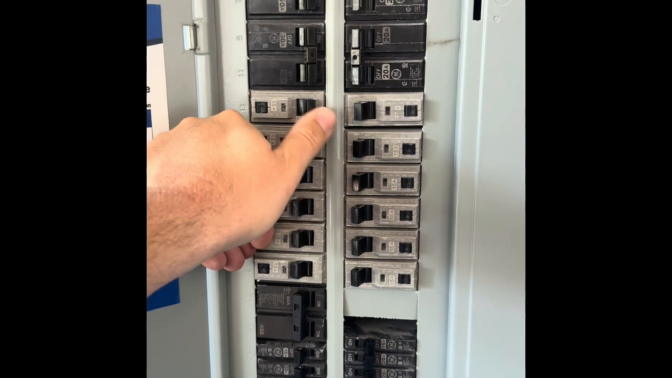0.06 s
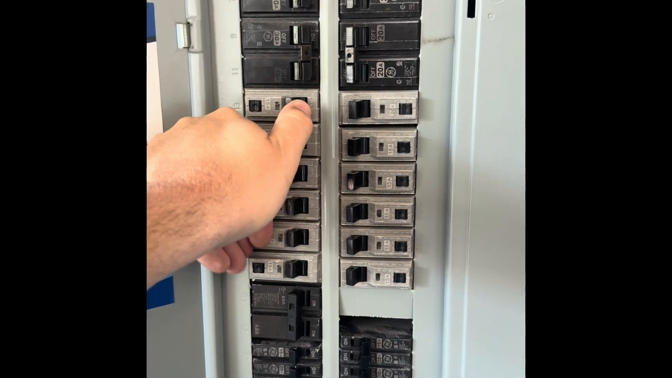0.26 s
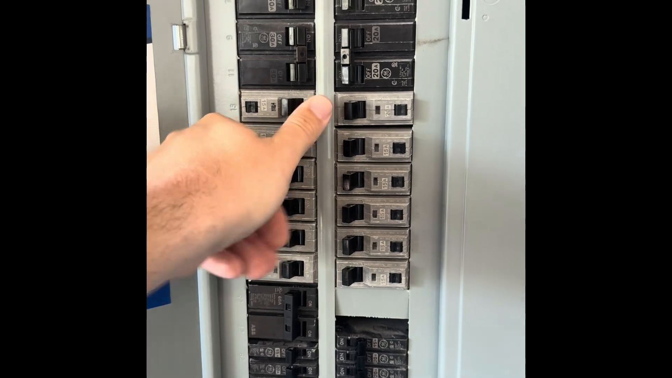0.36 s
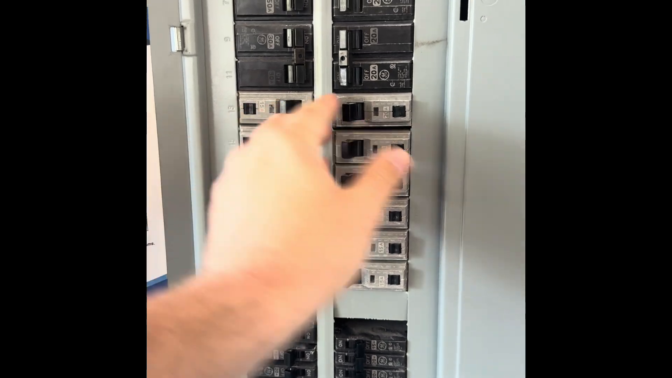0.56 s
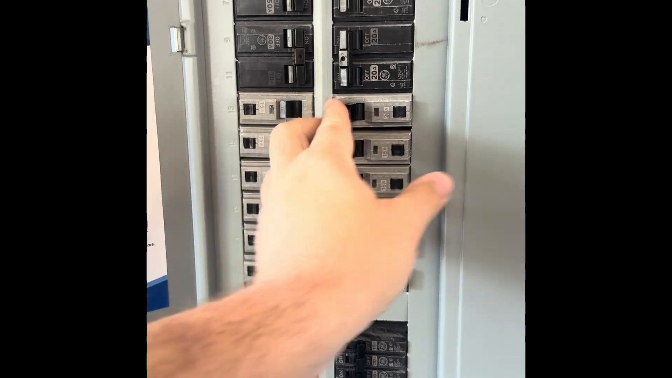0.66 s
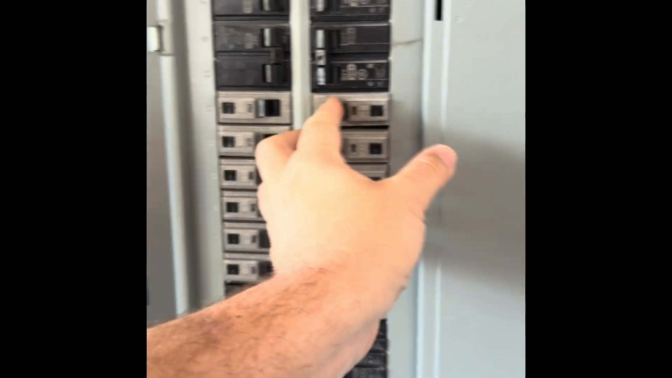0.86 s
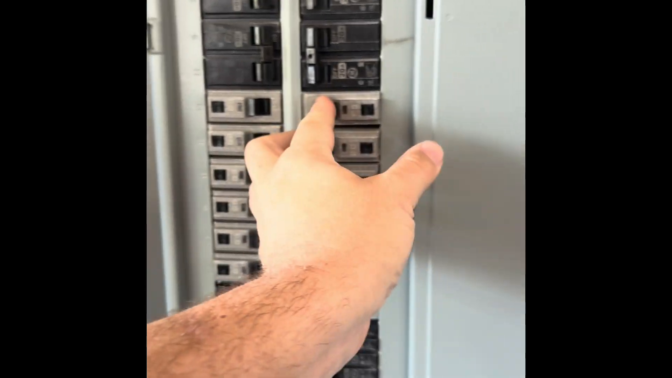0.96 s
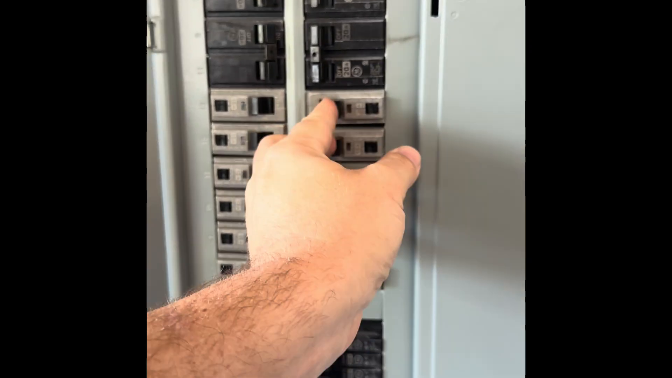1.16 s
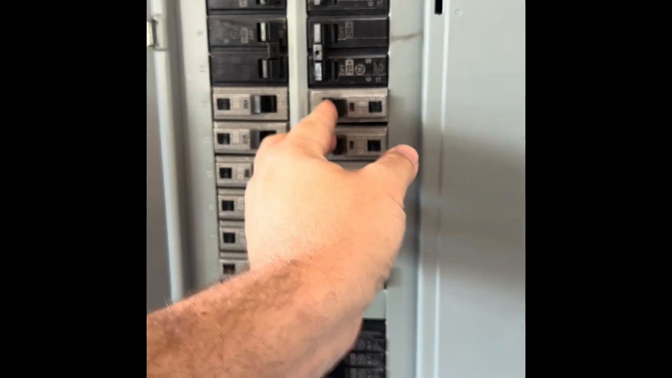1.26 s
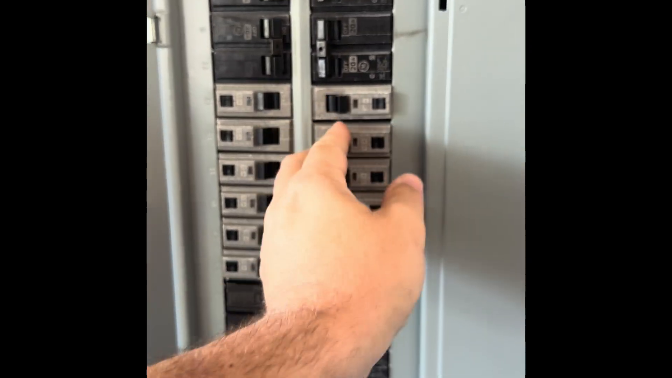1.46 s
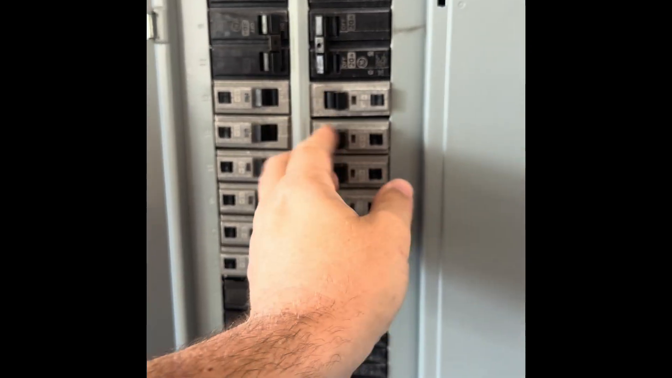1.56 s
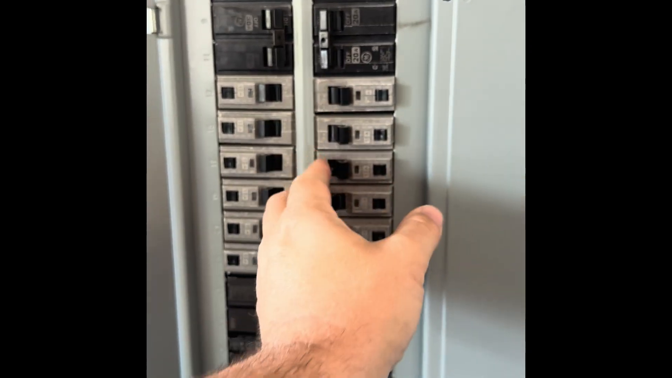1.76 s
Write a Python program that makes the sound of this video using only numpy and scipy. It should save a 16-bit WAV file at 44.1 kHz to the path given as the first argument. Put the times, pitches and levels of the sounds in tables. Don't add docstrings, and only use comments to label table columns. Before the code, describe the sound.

Four hard breaker-switch snaps in a steel panel, each with a short bright room echo.

```python
import sys
import numpy as np
from scipy import signal
from scipy.fft import rfft, irfft
from scipy.io import wavfile
from scipy.ndimage import uniform_filter1d

SR = 44100
rng = np.random.default_rng(int(sys.argv[2]) if len(sys.argv) > 2 else 0)


def master_out(mix):
    frames = np.transpose(np.atleast_2d(mix))
    ceiling = np.clip(frames, -1, 1)
    pcm = np.round(ceiling * 32767).astype(np.int16)
    wavfile.write(sys.argv[1], SR, pcm)


def voltage_ratio(level):
    return 10 ** (np.asarray(level, float) / 20)


N = 79380


def unit(x):
    return x / np.sqrt(np.mean(x ** 2) + 1e-30)


def on_log(hz, table):
    table = np.array(table, float)
    return np.interp(np.log(np.maximum(hz, 1)), np.log(table[:, 0]), table[:, 1])


def ring(x, hz, width):
    r = np.exp(-np.pi * width / SR)
    return signal.lfilter([1 - r, 0, r - 1], [1, -2 * r * np.cos(2 * np.pi * hz / SR), r * r], x)


def coloured(table):
    hz = np.arange(N // 2 + 1) * SR / N
    white = rfft(rng.standard_normal(N))
    noise = unit(irfft(white * voltage_ratio(on_log(hz, table)), N))
    return rfft(noise), hz


def walk(rate):
    k = int(SR / rate)
    steps = np.repeat(rng.standard_normal(N // k + 1), k)
    return unit(uniform_filter1d(steps, k)[:N])


# pitch_hz, level_db (per Hz)
AIR_MID_COLOUR = [(25, -29), (55, -7.5), (87, -6.5), (160, -20), (500, -28), (900, -27.5), (1600, -39),
                  (8500, -54.5), (10000, -90)]
AIR_SIDE_COLOUR = [(180, -21), (300, -12.5), (528, -4.5), (946, -1), (1230, -7), (1460, -12.5), (1900, -20),
                   (2880, -12.5), (15700, -32), (16050, -48)]
AIR_MID_DB, AIR_SIDE_DB = -50, -66


def air():
    mid = voltage_ratio(AIR_MID_DB) * irfft(coloured(AIR_MID_COLOUR)[0], N)
    side = voltage_ratio(AIR_SIDE_DB) * irfft(coloured(AIR_SIDE_COLOUR)[0], N)
    return np.array([mid, side])


# pitch_hz, width_hz, level_db
DRONE_TONES = [(84.3, 4, -2), (60, 5, -8), (105, 12, -17)]
# time_s, level_db
DRONE_LEVEL = [(0, -42), (.19, -44.5), (.3, -41.5), (.55, -42), (.8, -48.5), (.89, -62), (.97, -37),
               (1.06, -47), (1.13, -42.5), (1.22, -54), (1.31, -48), (1.36, -46.5), (1.42, -42),
               (1.47, -47), (1.53, -37.5), (1.62, -41), (1.67, -47), (1.8, -40.5)]
DRONE_LINE_SHARE = .9
DRONE_SLEW_S = .04


def drone(t):
    hum = 0
    for hz, width, db in DRONE_TONES:
        line = np.sin(2 * np.pi * (hz * t + rng.random()))
        noise = unit(ring(ring(rng.standard_normal(N), hz, width), hz, 2 * width))
        hum = hum + voltage_ratio(db) * (np.sqrt(2 * DRONE_LINE_SHARE) * line + np.sqrt(1 - DRONE_LINE_SHARE) * noise)
    level = np.interp(t, *np.array(DRONE_LEVEL).T)
    return voltage_ratio(uniform_filter1d(level, int(DRONE_SLEW_S * SR))) * hum


# start_s, level_db, low_band_db, high_band_db
SNAPS = [
    (-.11, -31.5, 1.5, -2.5),
    (.21, -30.5, -1, -2),
    (0.796, -45.5, 5.5, -8.5),
    (.8415, -29.5, 4, 2),
    (1.128, -29, 6, 5),
    (1.449, -29.5, -4.5, -3.5),
]
ECHO_TOP_DB = [-40, -50, -40, -4, -50, -50]
# pitch_hz, level_db (per Hz)
ECHO_MID_COLOUR = [(200, -5.5), (320, -2), (1420, -15.5), (2300, -9.5), (3900, -10.5), (6000, -3.5),
                   (8800, -5), (9900, -25.5), (13500, -52.5), (15500, -35.5), (16400, -54.5)]
ECHO_SIDE_COLOUR = [(180, -50.5), (300, -34.5), (1450, -17), (1770, -55), (1920, -22), (2510, -11.5),
                    (7980, -4.5), (15750, -15), (16050, -35)]
# pitch_hz, fade_s
ROOM_FADE = [(200, 0.53), (700, 0.16), (2000, 0.31), (5000, 0.38), (9000, 0.28), (15000, 0.39)]
ECHO_SIDE_DB, ECHO_TOP_HZ = -1, 10000
ECHO_LATE_S, ECHO_RISE_S = .008, .0045
LATE_DB, LATE_STRETCH = -25, 2.7
ECHO_LOW_HZ, ECHO_HIGH_HZ, ECHO_BAND_OCT = 2600, 8200, .3
RAGGED_DB, RAGGED_HZ = 2.2, 90
FLUTTER_DB = 0.5


def echo(t):
    mid, hz = coloured(ECHO_MID_COLOUR)
    side, _ = coloured(ECHO_SIDE_COLOUR)
    both = np.array([mid, side * voltage_ratio(ECHO_SIDE_DB)])

    def octaves_from(centre):
        return abs(np.log2(np.maximum(hz, 1) / centre))

    centres = 200 * 2 ** np.arange(0, 7.)
    bands = [irfft(np.clip(1 - octaves_from(c), 0, 1) * both, N) for c in centres]
    fades = on_log(centres, ROOM_FADE)
    low_bump = np.exp(-(octaves_from(ECHO_LOW_HZ) / ECHO_BAND_OCT) ** 2)
    high_bump = np.exp(-(octaves_from(ECHO_HIGH_HZ) / ECHO_BAND_OCT) ** 2)
    centre_top = np.array([[1], [0]]) * (hz > ECHO_TOP_HZ)
    wide = int(RAGGED_HZ * N / SR)
    out = 0
    for k, (s, db, low_db, high_db) in enumerate(SNAPS):
        u = np.maximum(t - s - ECHO_LATE_S, 0)
        rise = np.minimum(u / ECHO_RISE_S, 1)
        tail = 0
        for band, t60 in zip(bands, fades):
            quick = voltage_ratio(-120 * u / t60)
            slow = voltage_ratio(2 * LATE_DB - 120 * u / t60 / LATE_STRETCH)
            tail = tail + np.roll(band, k * N // 7, axis=1) * np.sqrt(quick + slow)
        ragged = unit(uniform_filter1d(uniform_filter1d(rng.standard_normal(len(hz)), wide), wide))
        colour_db = db + RAGGED_DB * ragged + low_db * low_bump + high_db * high_bump
        colour_db = colour_db + ECHO_TOP_DB[k] * centre_top
        out = out + irfft(rfft(tail * rise) * voltage_ratio(colour_db), N) * rise
    return out * voltage_ratio(FLUTTER_DB * uniform_filter1d(walk(250), SR // 500))


# pitch_hz, fade_s (by 60 dB)
PANEL = [(143, 0.15), (265, 0.07), (316, 0.08), (385, 0.055)]
# start_s, then level_db in each of the four panel modes
THUDS = [
    (-.1, -61, -50, -41, -44),
    (.221, -41.5, -37, -34, -50),
    (0.531, -51.5, -54.5, -56.5, -60),
    (.74, -58.5, -50, -66, -60),
    (.851, -41, -28.5, -36, -38),
    (1.137, -37.5, -42.5, -38, -47),
    (1.297, -57, -44.5, -62, -69),
    (1.336, -53.5, -49.5, -52.5, -58),
    (1.461, -28.5, -32, -27, -35),
]
THUD_PUSH_S, THUD_LATE_DB, THUD_STRETCH = 0.0032, -19.5, 7.4


def thud(t):
    out = 0
    for s, *mode_db in THUDS:
        u = np.maximum(t - s, 0)
        push = np.minimum(u / THUD_PUSH_S, 1)
        for db, (hz, t60) in zip(mode_db, PANEL):
            boom = voltage_ratio(-60 * u / t60)
            hum = voltage_ratio(THUD_LATE_DB - 60 * u / t60 / THUD_STRETCH) * walk(30)
            out = out + voltage_ratio(db) * (boom + hum) * push * np.sin(2 * np.pi * hz * u) * 2
    return out


def pure_tone(t, row, side_db):
    s, hz, db, rise, t60 = row
    u = np.maximum(t - s, 0)
    turn = 2 * np.pi * hz * u + np.array([[0], [np.pi / 2]])
    level_db = db + np.array([[0], [side_db]]) - 60 * np.maximum(u - rise, 0) / t60
    return voltage_ratio(level_db) * np.minimum(u / rise, 1) * np.sin(turn)


# start_s, pitch_hz, level_db, rise_s, fade_s (by 60 dB)
ARMS = [(-.01, 15200, -62, .01, .15), (.217, 14050, -58, .014, 0.07), (.275, 15100, -59, .02, .08),
        (.3, 14400, -66, .02, .1), (.855, 15000, -54.5, 0.022, .2), (.86, 14500, -57, 0.022, .1),
        (.945, 15200, -66, .02, .1), (1.137, 14040, -51.5, .012, .2), (1.15, 13850, -54, .025, .1),
        (1.205, 14200, -57, .02, .12), (1.228, 15600, -64, .018, .1), (1.455, 14800, -50.5, .01, .25),
        (1.455, 15350, -48, .01, 0.33), (1.455, 15800, -53, .01, 0.29)]
ARM_SIDE_DB, ARM_WAVER_HZ = -6.5, 180


def contact_arms(t):
    out = 0
    for row in ARMS:
        waver = uniform_filter1d(walk(ARM_WAVER_HZ), SR // 400)
        out = out + pure_tone(t, row, ARM_SIDE_DB) * waver
    return out


def case_grit():
    grains = rng.standard_normal((2, N))
    unevenness_db = 3.5 * rng.standard_normal(N)
    return unit(grains * voltage_ratio(unevenness_db))


# pitch_hz, width_hz, mid_db, side_db
CASE = [(654, 130, -29, -51), (1400, 560, -21.5, -37), (2010, 300, -12, -29.5), (2576, 840, -7.5, -10.5),
        (3810, 690, -15.5, -19), (4650, 970, -15.5, -23), (5885, 1200, -9, -14), (7150, 860, -19.5, -20),
        (8470, 1140, -14.5, -13), (10700, 5800, -45.5, -14.5), (14690, 810, -20, -18)]
CASE_GROUP = [1, 1, 0, 0, 1, 1, 1, 2, 2, 2, 2]
CREAK_MS, CREAK_END_MS = 6.5, 15


def in_case(t, grit, rows, side_db, creaks_stop):
    push = np.zeros((3, 2, N))
    for s, ms, db, low_db, high_db in rows:
        u = np.clip((t - s) / ms * 3000, 0, 30)
        if creaks_stop and ms > CREAK_END_MS:
            u = u + 10 * np.maximum(u - 1, 0)
        burst = (u * np.exp(1 - u)) ** (2 if ms > CREAK_MS else 1)
        level = voltage_ratio(db + np.add.outer([low_db, 0, high_db], [0, side_db]))
        push += level[..., None] * burst * 2
    out = np.zeros((2, N))
    for k, (hz, width, mid_db, mode_side_db) in enumerate(CASE):
        rung = ring(ring(grit * push[CASE_GROUP[k]], hz, width), hz, 2 * width)
        level = voltage_ratio(np.array([[mid_db], [mode_side_db]]) + 10 * np.log10(SR / 2 / width))
        out += (-1) ** k * level * rung
    return out


# start_s, length_ms, level_db, low_modes_db, high_modes_db
TOUCHES = [(.144, 5, -72, 8, 6), (.504, 6.1, -68, -8, -3), (0.547, 9.6, -68, -0.5, -3),
           (0.713, 58, -63, -6.5, -13.5), (0.729, 11, -74.5, -8, -7), (1.056, 2.1, -58, 2, -8),
           (1.33, 3, -65.5, 12.5, -3), (1.352, 10, -50.5, -1.5, -18), (1.677, 3.4, -68, 18, -7),
           (1.701, 5, -62, -6, 0), (1.702, 41, -59, -5.5, -20), (1.796, 4, -71.5, -3.5, -5)]


def fingers(t, grit):
    return in_case(t, grit, TOUCHES, side_db=-3, creaks_stop=False)


# start_s, length_ms, level_db, low_modes_db, high_modes_db
STRIKES = [(.196, 18, -54.5, 3, -11.5), (.2062, 3.1, -27, -4, 6), (.2093, 1.4, -15.5, -7, 3.5),
           (.2114, 3.2, -28.5, 0.5, 1), (.2145, 5, -36.5, -2.5, -8), (.7965, 1.4, -29.5, -6.5, 1.5),
           (.7985, 8.2, -42.5, -12.5, 4.5), (.8285, 2.3, -43, -7.5, -21), (.835, 2.1, -45, 12, -15.5),
           (.837, 2.23, -19, -16, 6.5), (.8397, 1.4, -18, -6, 7), (.8418, 1.5, -27, 4.5, 1.5),
           (.8445, 5, -35, 7, 7.5), (1.113, 37, -42, 2.5, -7.5), (1.1224, 1, -34, 5.5, -10.5),
           (1.1244, 1.6, -25, 6, 13.5), (1.1268, 2.2, -22.5, -4.5, 7.5), (1.1286, 5, -33.5, -9.5, -2),
           (1.131, 6, -39, 0, 0), (1.435, 36, -47, 7.5, -10), (1.444, 3.5, -38, -27.5, -2.5),
           (1.446, 2.1, -28.5, -5.5, 2.5), (1.4486, 1.9, -17.5, -9.5, 3.5), (1.4512, 3.5, -29, -10, -1),
           (1.4538, 5, -33, -5.5, 5)]


def breakers(t, grit):
    return in_case(t, grit, STRIKES, side_db=0, creaks_stop=True)


# start_s, pitch_hz, level_db, rise_s, fade_s (by 60
# dB)
CHIMES = [(.2066, 6100, -9.5, .0008, .006), (.2092, 5630, -10.5, 0.00092, 0.0054),
          (.2098, 6900, -15.5, .0006, .006), (.8374, 2564, -12.5, .001, 0.011),
          (.84, 5406, -7.5, .0006, 0.0048), (1.1228, 2565, -17, 0.0025, 0.0053),
          (1.1247, 5440, -14, 0.0005, 0.009), (1.1248, 6340, -14, .0005, .009),
          (1.1258, 2950, -17, .0006, .009), (1.1268, 5120, -17, .0006, .007),
          (1.1248, 7960, -18, .0004, .008), (.7967, 4480, -27.5, 0.00047, .007),
          (.7968, 5300, -25.5, .0005, .007), (1.704, 2180, -56, .004, .16), (1.703, 3680, -58, .003, .14),
          (1.702, 5050, -58, .002, .12), (1.4487, 4265, -21, .0008, .009), (.8395, 4300, -20, .0006, .007),
          (1.14, 2240, -48, .01, .3), (1.14, 2900, -50, .01, .25), (.2098, 1300, -28, .001, .012),
          (1.448, 1600, -27, .001, .012), (1.4465, 6080, -20.5, .001, .005),
          (1.4488, 6290, -13.5, 0.001, 0.008)]


def chimes(t):
    return sum(pure_tone(t, row, side_db=-9) for row in CHIMES)


# start_s, pitch_hz, level_db, rise_s, fade_s (by 60 dB)
SPRINGS = [
    (1.1165, 7850, -30, .007, .012),
    (1.436, 7700, -47, .004, .015),
    (.93, 8480, -59, .08, .5),
    (.22, 14050, -73, .02, .9),
    (.728, 7000, -63, .004, .06),
]


def springs(t):
    return sum(pure_tone(t, row, side_db=0) for row in SPRINGS)


def scene():
    t = np.arange(N) / SR
    centre_only = np.array([[1], [0]])
    grit = case_grit()
    mix = fingers(t, grit) + breakers(t, grit) + echo(t) + air()
    mix = mix + (thud(t) + drone(t)) * centre_only
    mix = mix + springs(t) + chimes(t) + contact_arms(t)
    mid, side = mix
    return np.array([mid + side, mid - side])


def top_cut(x):
    return signal.sosfilt(signal.butter(12, 16810, fs=SR, output="sos"), x)


def record(dry):
    limited = np.clip(dry, -1, 1)
    low_pass = signal.ellip(8, .2, 70, 16600, fs=SR, output="sos")
    mix = signal.sosfilt(low_pass, limited)
    return top_cut(mix)


dry = scene()
out = record(dry)
master_out(out)
```